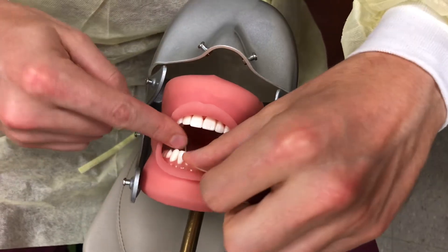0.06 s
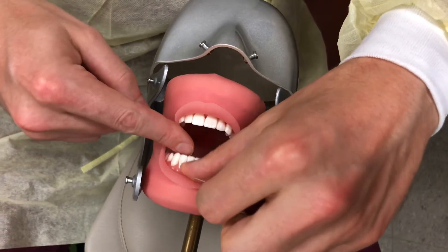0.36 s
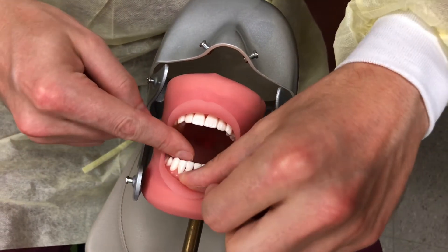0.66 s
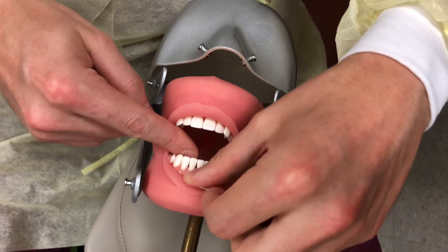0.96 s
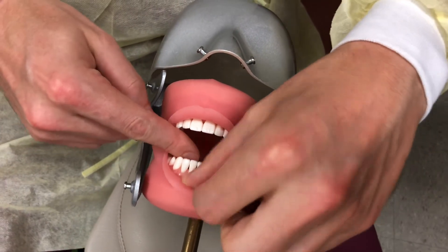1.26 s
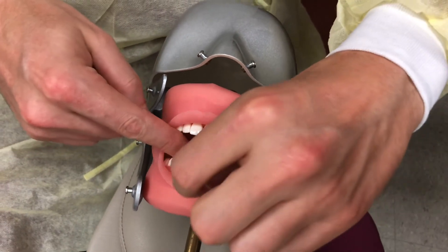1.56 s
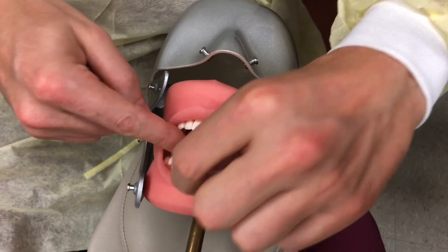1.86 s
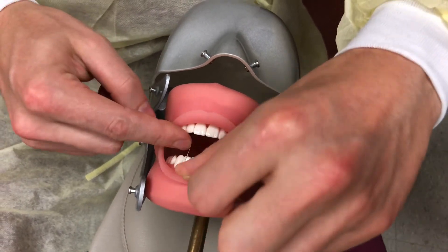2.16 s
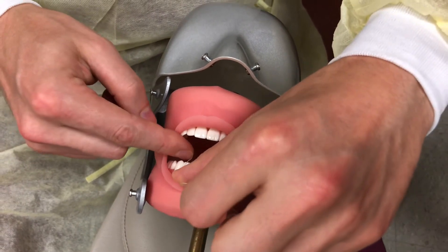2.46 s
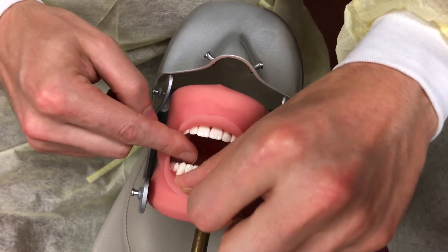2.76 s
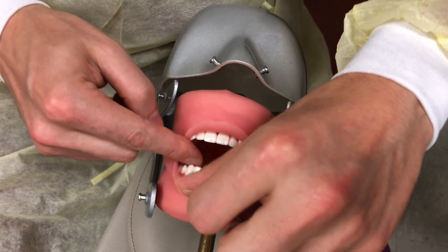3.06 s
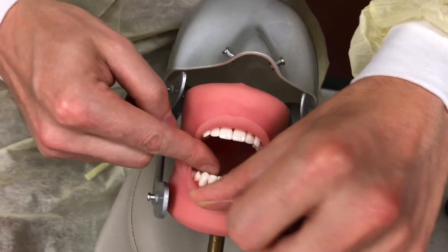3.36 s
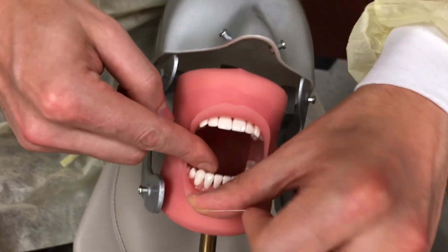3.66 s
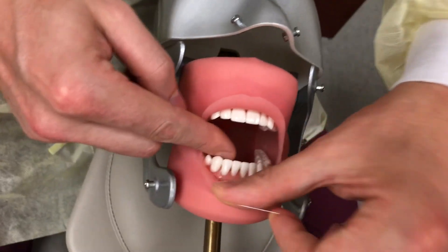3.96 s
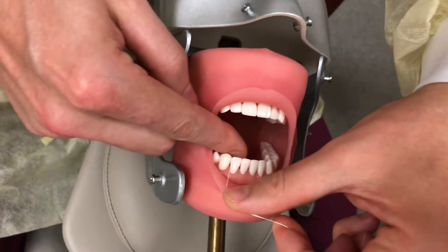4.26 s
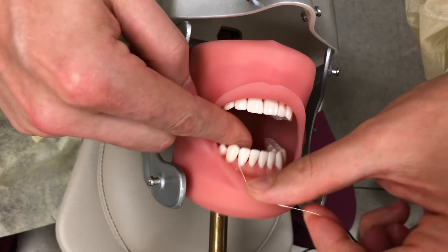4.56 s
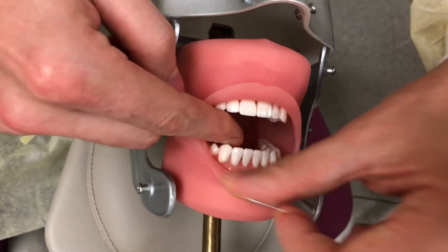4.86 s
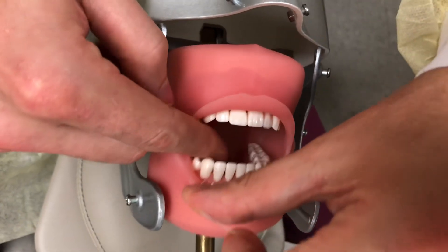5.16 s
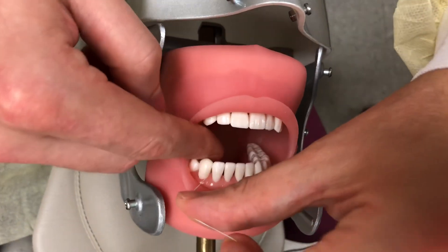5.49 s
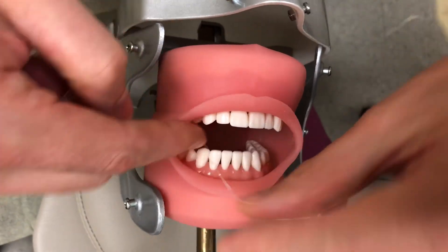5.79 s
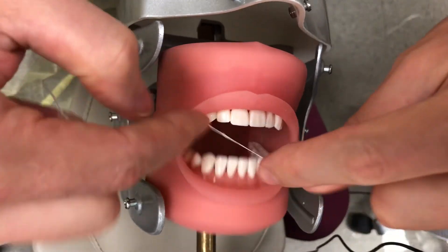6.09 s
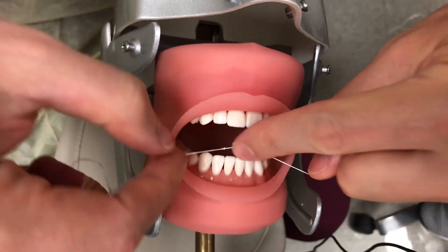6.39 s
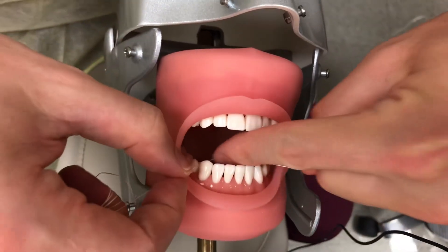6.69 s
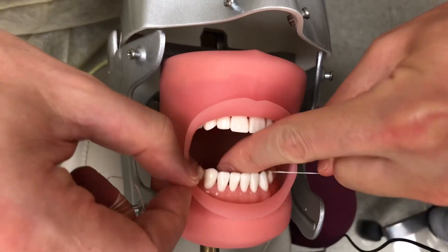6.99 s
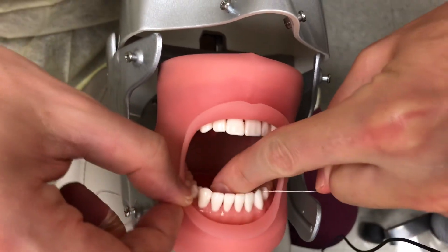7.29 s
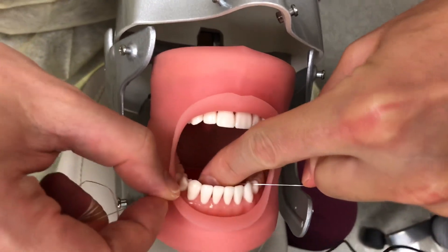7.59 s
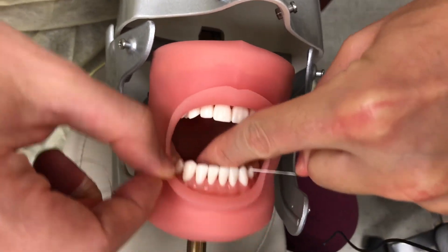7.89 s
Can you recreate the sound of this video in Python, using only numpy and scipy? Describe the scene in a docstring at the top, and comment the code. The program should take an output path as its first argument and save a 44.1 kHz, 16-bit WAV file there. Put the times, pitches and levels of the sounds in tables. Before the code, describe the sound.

A steady low ventilation hum and rumble runs throughout in a small room. Close up, floss is worked between the plastic teeth of a dental training model. From the start, the jaw gives light, irregular ticks and knocks under the fingers, and a faint rub sets in at about 1 second. Just before 2 seconds the thread snaps through a tight gap amid a quick cluster of clicks. Until about 3.5 seconds it scratches and swishes softly over the teeth. Between 4 and 5 seconds come smaller snaps, more plastic knocks and soft drags of fingers on the rubber cheek, followed by faint swishes. At 6 seconds there is a bright double snap with a clack. The handling then falls almost silent under the hum until the sharpest snap at about 7.7 seconds, followed by a small knock.

```python
"""Floss is worked between the plastic teeth of a dental training head, close up in a small room.
Ventilation rumbles and hums throughout. First the jaw ticks and knocks under the fingers, and a
light rub sets in. Near 2 seconds the thread snaps through a tight contact, then scratches and
swishes over the teeth while fingers drag on the rubber cheek. More snaps come between 4 and 6
seconds, among further knocks. After a lull, the sharpest snap comes just before the end."""
import sys
import numpy as np
from scipy import signal
from scipy.fft import next_fast_len
from scipy.io import wavfile
from scipy.ndimage import uniform_filter1d

SR = 44100
rng = np.random.default_rng(int(sys.argv[2]) if len(sys.argv) > 2 else 0)


def transcribe(signal):
    """Save signal, clipped to [-1, 1], as a 16-bit WAV file at the path in sys.argv[1]."""
    frames = np.atleast_2d(signal).T
    limited = np.clip(frames, -1, 1)
    pcm = np.round(limited * 32767).astype(np.int16)
    wavfile.write(sys.argv[1], SR, pcm)


N = 350154
TIME = np.arange(N) / SR
RING_TIME = np.arange(9000) / SR  # seconds since a hit began


def gain_of(db):
    """Turns decibels (dB) into a number to multiply by."""
    return 10 ** (np.asarray(db) / 20)


def evened(x):
    """Scales a sound so that its average strength (rms) is 1."""
    return x / np.sqrt(np.mean(x ** 2) + 1e-20)


def peaked(x, samples=176):
    """Scales a sound so that its loudest few milliseconds have strength 1."""
    return x / np.sqrt(uniform_filter1d(x ** 2, samples, mode="constant").max() + 1e-20)


def value_at(points, hz):
    """Reads between rows of (Hz, value), giving each octave the same space."""
    point_hz, value = np.transpose(points)
    return np.interp(np.log(hz + 1), np.log(point_hz + 1), value)


def add(mix, start_s, sound):
    """Mixes a sound in at its start time."""
    part = mix[round(start_s * SR):][:len(sound)]
    part += sound[:len(part)]


def band(x, low_hz, high_hz):
    """Keeps the pitches between two limits."""
    edges = [low_hz, min(high_hz, SR / 2 - 1)]
    return signal.sosfilt(signal.butter(3, edges, "band", fs=SR, output="sos"), x)


def coloured(x, colour):
    """Makes each pitch louder or softer, without ringing ahead of any click."""
    size = next_fast_len(len(x))
    hz = abs(np.fft.fftfreq(size, 1 / SR))
    log_gain = np.log(gain_of(value_at(colour, hz)))
    response = np.exp(np.conj(signal.hilbert(log_gain)))
    return np.fft.ifft(np.fft.fft(x, size) * response).real[:len(x)]


def resonate(x, hz, width_hz):
    """A resonance: favours the pitches around hz."""
    pole = np.exp((2j * np.pi * hz - np.pi * width_hz) / SR)
    return signal.lfilter([1 - abs(pole)], [1, -pole], x).real


def wander(per_s):
    """A random curve that takes a new turn about per_s times a second."""
    return evened(np.interp(TIME * per_s, np.arange(4096), rng.standard_normal(4096)))


def ring(hz, fade_s):
    """One dying tone. A fade time, here and below, is the time it takes to fall by 60 dB."""
    return np.sin(2 * np.pi * (hz * RING_TIME + rng.random())) * gain_of(-60 * RING_TIME / fade_s)


def burst(fade_s):
    """Noise that starts at once and dies quickly."""
    return rng.standard_normal(len(RING_TIME)) * gain_of(-60 * RING_TIME / fade_s)


def ventilation(rumble_db=-32.5, air_db=-55, waver=0.037, drift_cycles=0.062):
    """The hum of the fan and the mains wavers over duct rumble and steady air."""
    # Tones of the fan and the mains. Each row: pitch in Hz, level in dB.
    hum_tones = [(14.85, -26), (29.67, -29), (41.26, -47.5), (44.52, -40), (57.72, -53), (65.97, -50.5),
                 (74.21, -58.5), (119.95, -55.5), (180, -59.5), (184, -62.5)]
    # Colours of the duct rumble and the room air. Each row: pitch in Hz, relative level in dB.
    rumble_colour = [(5, -10), (17, 2), (24, 10), (34, -23.5), (48, -5), (62, -18.5), (82, -19.5),
                     (125, -17.5), (165, -21), (190, -20), (225, -30.5), (300, -63.5)]
    air_colour = [(130, -13.5), (215, 1.5), (280, -4.5), (370, -7.5), (480, -11), (630, -15), (820, -15),
                  (1450, -26), (2250, -24.5), (3300, -35), (6400, -33.5), (10500, -35.5), (13000, -36),
                  (15400, -49), (16500, -65)]
    hum = np.zeros(N)
    for hz, db in hum_tones:
        strength = gain_of(db) * (1 + waver * wander(2.9))
        cycles = hz * TIME + rng.random() + drift_cycles * wander(1.595)
        hum += strength * evened(np.sin(2 * np.pi * cycles))
    rumble = evened(coloured(rng.standard_normal(N), rumble_colour))
    air = evened(coloured(rng.standard_normal(N), air_colour))
    return hum + gain_of(rumble_db) * rumble + gain_of(air_db) * air


def room(x, echo_s=0.0095, echo_db=-17, build_s=0.0019):
    """The room answers with one near echo and a short tail whose pitches die at their own speeds."""
    # The room's tail. Each row: pitch in Hz, fade time in seconds, level in dB.
    tail_bands = np.array([(286, 0.3, 5), (1000, 0.22, -9), (3000, 0.32, -11), (7000, 0.52, -13.5),
                           (14000, 0.4, -11)])
    t = np.arange(SR // 2) / SR
    hz, slice_s, noise = signal.stft(rng.standard_normal(len(t)), SR, nperseg=256)
    fade_s = value_at(tail_bands[:, [0, 1]], hz)[:, None]
    level_db = value_at(tail_bands[:, [0, 2]], hz)[:, None]
    same_energy = np.sqrt(2 * np.log(1000) / (fade_s * SR))  # for long and short fades alike
    fading = noise * same_energy * gain_of(level_db - 60 * slice_s / fade_s)
    tail = signal.istft(fading, SR, nperseg=256)[1][:len(t)]
    tail *= np.minimum(t / build_s, 1)
    tail[round(echo_s * SR)] += gain_of(echo_db)
    return signal.fftconvolve(x, tail)[:N]


def friction(slips_per_s, spread_db, rush):
    """Tiny slips of uneven size over a smooth rush of noise."""
    sizes = gain_of(spread_db * np.minimum(rng.exponential(1, N), 4)) * rng.choice([-1, 1], N)
    slips = sizes * (rng.random(N) < slips_per_s / SR)
    return evened(evened(slips) + rush * rng.standard_normal(N))


def grip(flutter_db=1.4, flutters_per_s=110):
    """The level flutters as a sliding thing sticks and lets go unevenly."""
    return evened(gain_of(flutter_db * wander(flutters_per_s)))


def arch(length_s, skew=0.5, sharpness=1.4):
    """One stroke of the hand swells faster than it fades."""
    progress = np.linspace(0, 1, round(length_s * SR))
    return abs(np.sin(np.pi * progress ** skew)) ** sharpness


def rubbed(slips, strokes, width_hz):
    """Each stroke sends the slips through its own resonance, twice to narrow the sound."""
    out = np.zeros(N)
    for start_s, length_s, db, hz in strokes:
        swell = arch(length_s)
        part = np.roll(slips, -round(start_s * SR))[:len(swell)]
        tuned = resonate(resonate(part, hz, width_hz), hz, width_hz)
        add(out, start_s, gain_of(db) * swell * evened(tuned))
    return out


def dragging(width_hz=900, trim_db=-1):
    """Fingers slip on the rubber cheek, through a broad resonance set by the grip."""
    # Finger drags. Each row: start in seconds, length in seconds, relative level in dB, pitch in Hz.
    drags = [(2.073, 0.076, -66, 1570), (2.565, 0.016, -59, 1100), (3.045, 0.018, -57, 1050),
             (3.375, 0.094, -62, 840), (3.519, 0.013, -57.5, 1640), (4.08, 0.12, -50.5, 1100),
             (4.27, 0.14, -56.5, 814), (4.58, 0.074, -51.5, 1020), (4.603, 0.21, -58.5, 450),
             (4.893, 0.24, -51.5, 423), (5.684, 0.13, -59, 1080), (7.873, 0.11, -58, 550)]
    slips = friction(slips_per_s=900, spread_db=3.1, rush=0.6)
    return gain_of(trim_db) * band(rubbed(slips, drags, width_hz), 110, 5000)


def crackle(catches_per_s=130, low_hz=1200, high_hz=7500, fade_s=0.0029, pitches=10):
    """Tiny catches of the thread, each a brief ping at one of several pitches."""
    catches = friction(catches_per_s, spread_db=1.5, rush=0)
    chosen = rng.integers(0, pitches, N)
    pings = np.zeros(N)
    for k, hz in enumerate(np.geomspace(low_hz, high_hz, pitches)):
        pings += np.convolve(catches * (chosen == k), ring(hz, fade_s)[:256], "same")
    return evened(pings)


def sliding(rub_trim_db=-2.5, stroke_trim_db=4.0, crackle_share=0.55):
    """Skin and thread crackle finely over the teeth: a light rub that swells with each stroke."""
    # Colour of the sliding. Each row: pitch in Hz, relative level in dB.
    slide_colour = [(500, 3), (1200, 12), (2200, 8.5), (3500, 5.5), (6500, 7.5), (11500, 4), (14000, 1),
                    (16500, -27)]
    # Lasting rub of fingers resting on the teeth. Each row: time in seconds, relative level in dB.
    resting_rub = [(.95, -70), (1.3, -63.5), (1.8, -63.5), (2.1, -61.5), (2.6, -62.5), (3.3, -63.5),
                   (3.55, -68), (4.3, -61.5), (4.7, -65.5), (5.2, -62.5), (5.4, -69), (6.4, -65.5),
                   (7.5, -72.5)]
    # Strokes over the teeth. Each row: start in seconds, length in seconds, relative level in dB.
    strokes = [(2.057, 0.11, -63), (2.436, 0.16, -64.5), (2.572, 0.12, -67), (2.75, 0.084, -66),
               (2.845, 0.05, -69), (3, 0.33, -67.5), (3.26, 0.088, -63.5), (3.381, 0.074, -66),
               (3.472, 0.026, -62), (4.208, 0.27, -68), (4.863, 0.31, -67.5), (5.176, 0.21, -67)]
    slips = friction(slips_per_s=1100, spread_db=0.95, rush=1.0)
    rustle = evened(coloured(slips, slide_colour)) + crackle_share * crackle()
    rub_db = np.interp(TIME, *np.transpose(resting_rub))
    power = gain_of(rub_db + rub_trim_db) ** 2
    for start_s, length_s, db in strokes:
        add(power, start_s, (gain_of(db + stroke_trim_db) * arch(length_s)) ** 2)
    return rustle * grip() * np.sqrt(power)


def swishing(width_hz=5000, trim_db=-1):
    """The taut thread hisses as it runs; a faster run has a higher pitch."""
    # Swishes. Each row: start in seconds, length in seconds, relative level in dB, pitch in Hz.
    swishes = [(2.854, 0.12, -56.5, 6940), (2.865, 0.05, -69, 4300), (2.957, 0.1, -60.5, 10100),
               (3.03, 0.2, -59, 8700), (3.162, 0.2, -63, 9300), (3.26, 0.16, -59.5, 10000),
               (3.366, 0.11, -62, 10800), (5.122, 0.27, -62, 8850), (5.69, 0.25, -64.5, 7560)]
    slips = friction(slips_per_s=1500, spread_db=0.89, rush=0.74) * grip()
    return gain_of(trim_db) * rubbed(slips, swishes, width_hz)


def scratching(width_hz=10000, trim_db=-1):
    """The thread catches on a tooth and makes a brief, bright run of slips."""
    # Scratches. Each row: start in seconds, length in seconds, relative level in dB, pitch in Hz.
    scratches = [(2.07, .008, -59, 9000), (2.094, 0.0068, -60, 5500), (2.317, .004, -54, 10500),
                 (2.337, .006, -55, 7000), (2.36, .004, -50, 9500), (2.37, .005, -54, 8500),
                 (2.442, .005, -52, 7500), (2.493, 0.045, -55, 6500), (2.568, .007, -58, 7000),
                 (2.591, 0.0056, -52, 6000), (2.637, 0.0037, -50, 7500), (2.864, .014, -51.5, 7000),
                 (3.182, .012, -55, 6000), (3.474, .02, -60, 9500), (3.553, 0.027, -61, 9500),
                 (4.293, .006, -51, 9000), (6.051, .006, -55, 10000)]
    slips = friction(slips_per_s=3300, spread_db=2.7, rush=0.89)
    return gain_of(trim_db) * band(rubbed(slips, scratches, width_hz), 2900, 16600)


def jaw_ring(spread_db=3):
    """The plastic jaw and its metal frame ring, with a balance of tones that varies from hit to hit."""
    # The jaw's own tones. Each row: pitch in Hz, relative level in dB, fade time in seconds.
    jaw_tones = [(500, 0.5, 0.078), (581, 6.5, 0.073), (870, 0.5, 0.052), (1375, 12, 0.027),
                 (1740, 1.5, 0.07), (2154, 7.5, 0.036), (2313, 6.5, 0.053), (2900, 2, 0.033),
                 (3400, 5, 0.018), (4150, -0.5, 0.07), (5200, -2, 0.053), (6500, -10, 0.08)]
    return peaked(sum(gain_of(db + spread_db * rng.standard_normal()) * ring(hz, fade_s)
                      for hz, db, fade_s in jaw_tones))


def tick_part(hit, low_hz, high_hz, hz, tone_db, fade_cycles, rise_s):
    """One band of a hit, plus the tone that the touched spot favours; higher tones die sooner."""
    tone = gain_of(tone_db) * peaked(ring(hz, fade_cycles / hz))
    sound = peaked(band(hit, low_hz, high_hz)) + tone
    onset = 1 - np.exp(-RING_TIME / rise_s)
    return peaked(band(sound * onset, low_hz, high_hz))


def tick(knock_db, knock_hz, clack_db, clack_hz, edge_db, edge_hz, purity_db, contact_db=2):
    """One touch gives a low knock of the whole jaw, a plastic clack and a sharp edge."""
    # Colour of a fingertip or tooth contact. Each row: pitch in Hz, relative level in dB.
    contact_colour = [(400, -5.5), (1100, -8.5), (2300, -9), (3600, -12), (6000, -14), (9000, -20.5),
                      (14000, -11), (16500, -80)]
    contact = coloured(burst(fade_s=0.032), contact_colour)
    hit = jaw_ring() + gain_of(contact_db) * peaked(contact)
    knock = tick_part(hit, 0.5 * knock_hz, 1610, knock_hz, purity_db, fade_cycles=19, rise_s=0.0008)
    clack = tick_part(hit, 1427, 3540, clack_hz, purity_db + 2, fade_cycles=40, rise_s=0.0019)
    edge = tick_part(hit, 0.66 * edge_hz, 10400, edge_hz, purity_db - 1, fade_cycles=40, rise_s=0.0011)
    return gain_of(knock_db) * knock + gain_of(clack_db) * clack + gain_of(edge_db) * edge


def ticks():
    """Fingertips and thread catch on the teeth and rock the jaw."""
    # Touches on the jaw. Each row: start in seconds, then level in dB and pitch in Hz for the knock,
    # the clack and the edge in turn, then purity in dB (how far those three pitches stand out).
    touches = [(0.086, -42.5, 476, -50.5, 2970, -48.5, 3330, 10),
               (0.182, -67, 600, -72, 2380, -55, 4300, -6), (0.203, -52.5, 570, -57.5, 1740, -70, 2900, -1),
               (0.41, -86, 450, -64, 3160, -53, 4350, -2), (0.424, -66, 446, -71, 3100, -62, 4260, -2),
               (0.587, -63, 438, -65, 2770, -64, 4300, 1),
               (0.723, -46.5, 640, -54.5, 2900, -55.5, 4930, -2),
               (0.79, -51.5, 770, -51, 1700, -50.5, 2980, 6),
               (0.888, -51.5, 680, -52.5, 1740, -55, 6450, 1), (0.905, -57, 640, -55, 2800, -55, 6170, 2),
               (1.263, -45, 670, -51, 2280, -52.5, 3000, -5),
               (1.427, -47.5, 570, -55.5, 1720, -71, 3000, 0), (1.465, -50, 576, -63, 1720, -63, 4100, -4),
               (1.551, -45, 606, -57, 2250, -70, 3000, -2), (1.829, -51, 583, -58, 2330, -60, 3400, 3),
               (1.858, -46, 580, -52, 2300, -48.5, 3460, -2),
               (1.871, -44.5, 550, -43.5, 2220, -62, 3000, -6), (1.886, -41, 594, -52, 2300, -52, 4100, -1),
               (1.904, -44, 535, -62, 2170, -65, 4100, 10), (2.428, -56, 704, -65, 1970, -56, 4160, 1),
               (2.558, -52.5, 1000, -56.5, 2100, -72, 3180, -2), (3.157, -66, 570, -55, 2320, -57, 3500, 0),
               (3.407, -49, 776, -52.5, 1830, -66, 3400, 5), (3.63, -43.5, 936, -59, 2020, -48.5, 4280, 4),
               (3.934, -45, 1000, -53, 2280, -52.5, 6300, 2.5), (4.091, -44, 1180, -54, 1580, -58, 3400, 1),
               (4.125, -46.5, 830, -44, 1970, -49.5, 3000, -2), (4.169, -50, 1220, -53, 2070, -56, 4200, 1),
               (4.2706, -40.5, 932, -39.5, 1725, -49.5, 3720, 2),
               (4.462, -47, 810, -63, 1620, -72, 3000, 4.5), (4.598, -46, 1170, -49, 2220, -51.5, 2720, 9),
               (4.647, -45.5, 1160, -66, 1710, -72, 3000, -4), (4.704, -49, 1120, -59, 2270, -65, 3000, 3),
               (4.724, -51.5, 1160, -59, 1910, -70, 3000, 3), (4.791, -49, 870, -74, 1660, -77, 3000, 6),
               (5.327, -57, 810, -59, 2180, -61, 4100, 0), (5.556, -55, 1000, -57, 2200, -62, 3320, 4),
               (5.705, -59, 930, -55.5, 1720, -54.5, 4100, -1),
               (5.829, -42, 690, -44.5, 2226, -58, 3260, 3.5), (5.993, -39.5, 595, -44, 2150, -54, 3400, 4),
               (6.009, -36.5, 521, -34.5, 2220, -40, 3390, 5.5),
               (6.021, -49, 530, -53, 2080, -59, 3350, -2), (6.045, -41, 522, -52, 2240, -64, 3400, 5),
               (7.722, -47, 508, -61, 2300, -64, 4170, 5), (7.88, -48.5, 720, -70, 1500, -60.5, 3100, -2)]
    out = np.zeros(N)
    for start_s, *touch in touches:
        add(out, start_s, tick(*touch))
    return out


def fibres(depth_db=4, samples=14):
    """The level jumps as the thread's strands let go, fractions of a millisecond apart."""
    jitter = uniform_filter1d(rng.standard_normal(len(RING_TIME)), samples)
    return gain_of(depth_db * evened(jitter))


def snaps(frame_db=-19, frame_fade_s=0.26, tooth_hz=970, tooth_fade_s=0.019, per_cluster=14):
    """The taut thread lets go: a bright crack, the ping and knock of the tooth, and the frame rings on."""
    # Snaps through a tight contact. Each row: start in seconds, crack level in dB, knock level in dB,
    # crack fade time in seconds, crack's lower edge in Hz, ping pitch in Hz, relative ping level in dB.
    snap_events = [(1.8677, -37.5, -49, 0.05, 5200, 7000, -14), (4.075, -51.5, -59, 0.034, 5000, 6600, -11),
                   (4.101, -48.5, -64, 0.041, 2600, 5600, -13), (4.586, -47, -65, 0.057, 4400, 4740, -12),
                   (5.9873, -35.5, -50, 0.039, 4220, 6640, -6), (5.9958, -47, -60, 0.012, 10500, 14000, -6),
                   (6.007, -42.5, -49, 0.022, 2800, 4850, 2), (7.701, -28, -40.5, 0.029, 4320, 5630, -9.5),
                   (7.709, -41, -64, 0.016, 9500, 9300, -6)]
    # Colour of the crack. Each row: pitch in Hz, relative level in dB.
    crack_colour = [(800, -9), (1800, -5), (2700, 8.5), (3300, 4), (4200, 6), (5000, 0.5), (5700, -0.5),
                    (7000, 2.5), (8300, -2.5), (9200, 1.5), (11000, 0), (12800, -1), (13700, -5),
                    (15400, -7), (16500, -18)]
    # Clusters of tones in the metal frame. Each row: centre in Hz, width in Hz, relative level in dB.
    clusters = [(4100, 780, -1), (6720, 730, 3), (9500, 1700, -1), (11800, 1200, -3)]
    frame_tones = [(hz + width_hz * (k + rng.random() - per_cluster / 2) / per_cluster, db)
                   for hz, width_hz, db in clusters for k in range(per_cluster)]
    out = np.zeros(N)
    for start_s, crack_db, knock_db, fade_s, low_hz, ping_hz, ping_db in snap_events:
        release = 3.0 * burst(fade_s=0.005)
        ping = peaked(ring(ping_hz, fade_s=0.008))  # the socket quickly stills the plucked tooth
        noise = peaked(coloured(release + fibres() * burst(fade_s), crack_colour))
        # A shorter, tauter span of thread cracks higher.
        low_cut = signal.butter(2, low_hz, "high", fs=SR, output="sos")
        crack = peaked(signal.sosfilt(low_cut, noise + gain_of(ping_db) * ping))
        frame = peaked(sum(gain_of(db) * ring(hz, frame_fade_s) for hz, db in frame_tones))
        knock = peaked(band(ring(tooth_hz, tooth_fade_s), 230, 1200))
        add(out, start_s, gain_of(crack_db) * (crack + gain_of(frame_db) * frame))
        add(out, start_s, gain_of(knock_db) * knock)
    return out


def scene():
    """The flossing and its echo in the room, over the ventilation, in one channel."""
    flossing = ticks() + snaps() + sliding() + scratching() + swishing() + dragging()
    return (flossing + room(flossing) + ventilation())[None]


def record(dry):
    """Cuts away the very highest treble."""
    treble_cut = signal.firwin(511, cutoff=16300, window=("kaiser", 9), fs=SR)
    return signal.oaconvolve(dry, treble_cut[None], "same")


dry = scene()
out = record(dry)
transcribe(out)
```